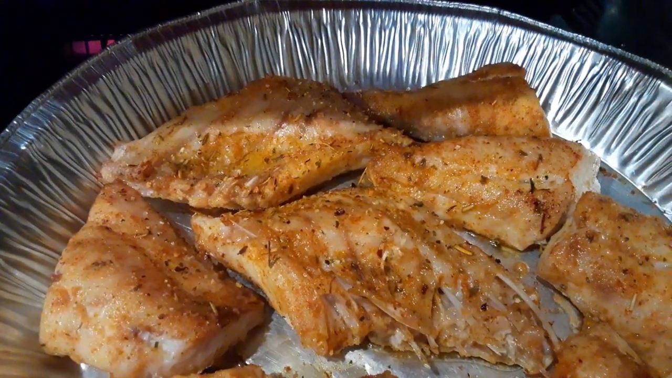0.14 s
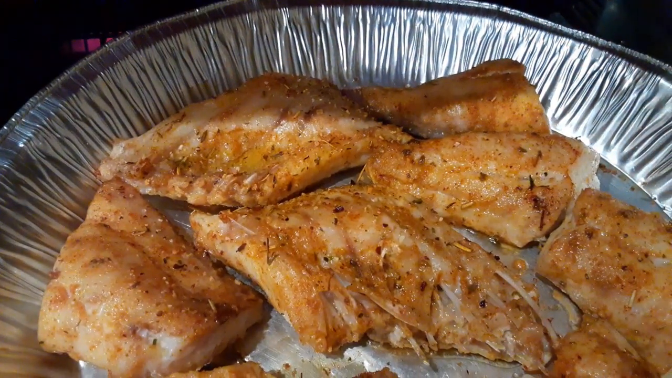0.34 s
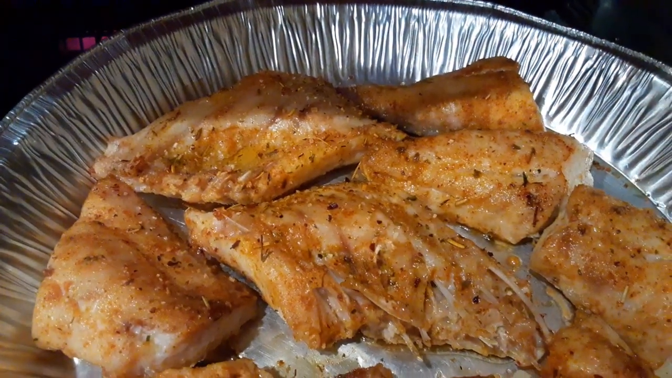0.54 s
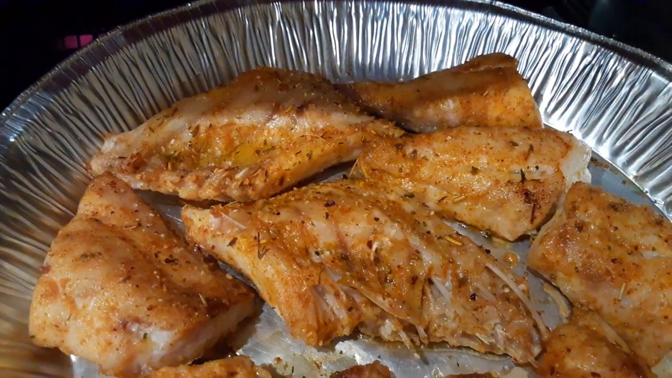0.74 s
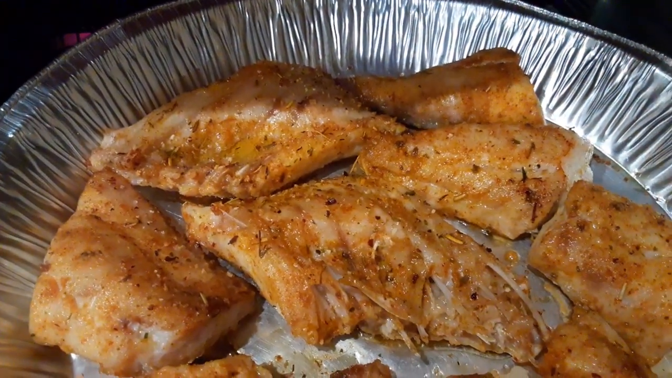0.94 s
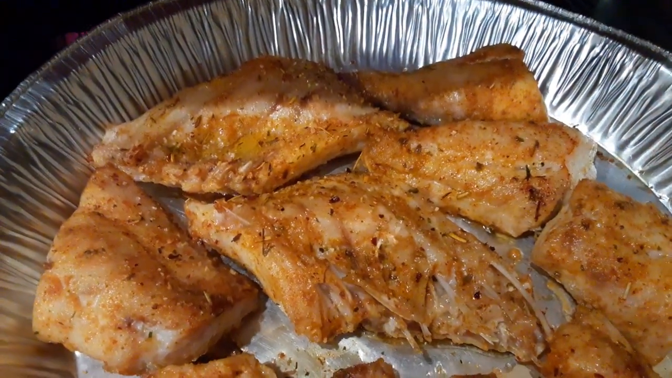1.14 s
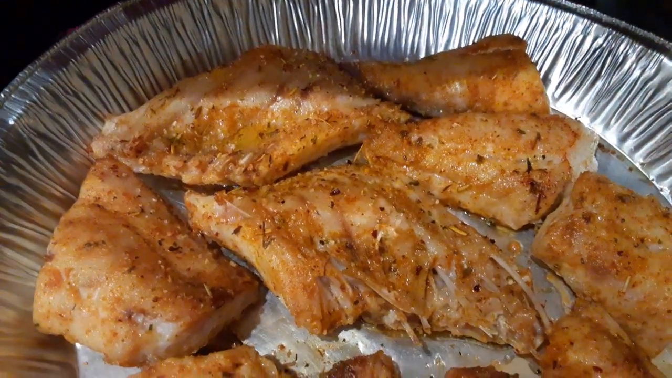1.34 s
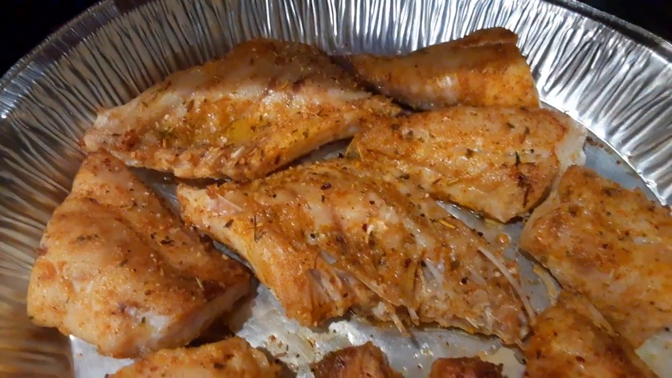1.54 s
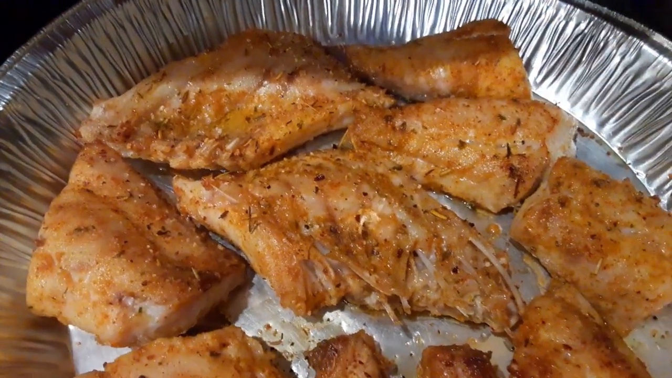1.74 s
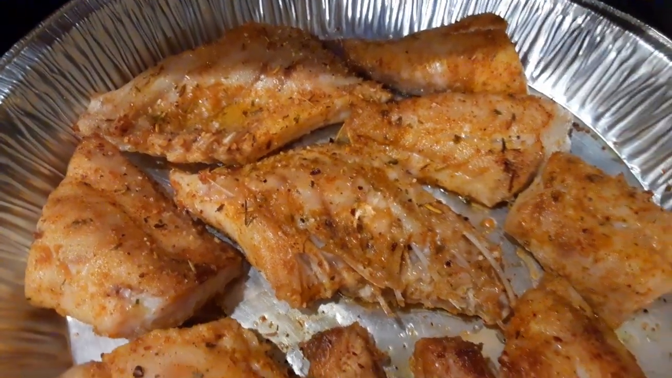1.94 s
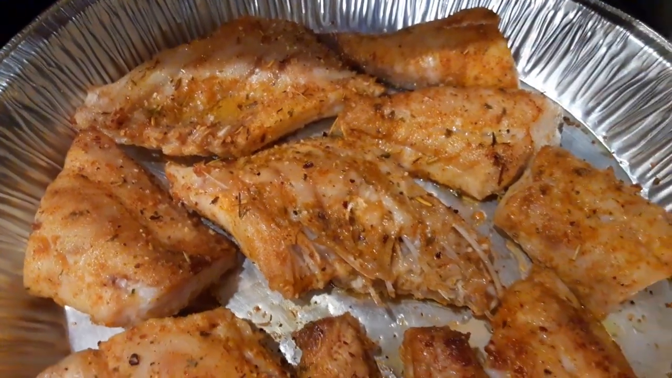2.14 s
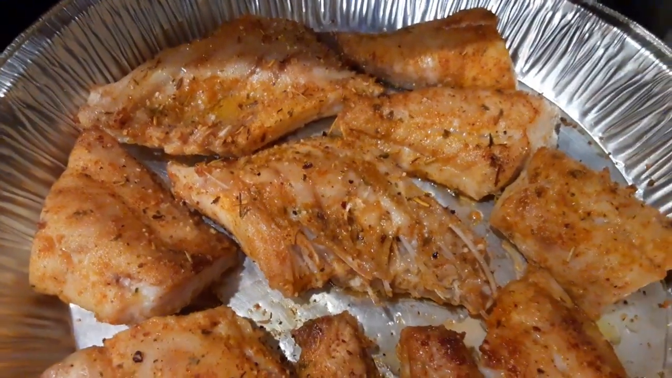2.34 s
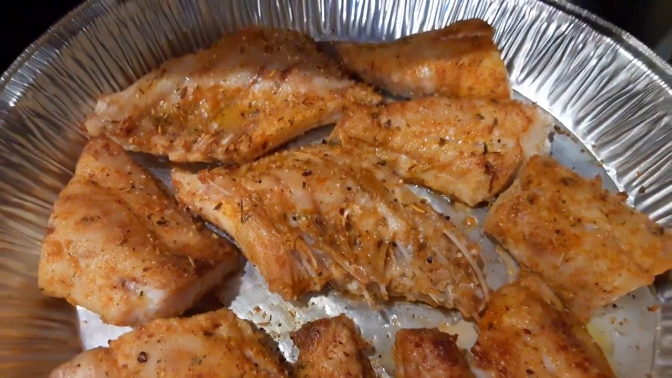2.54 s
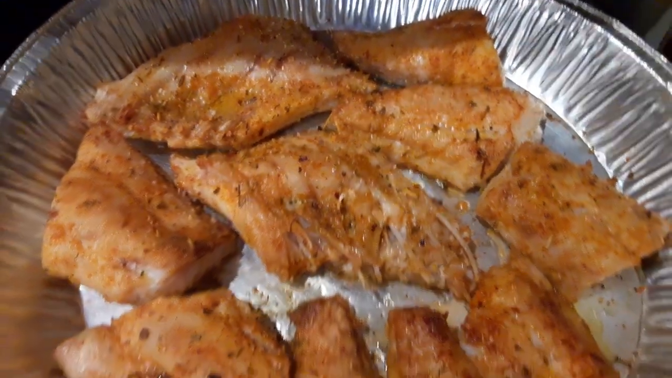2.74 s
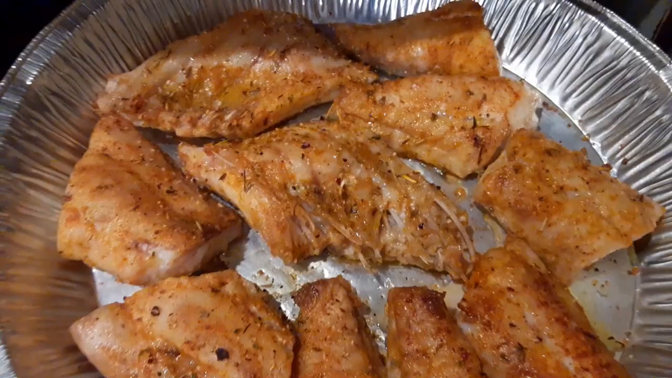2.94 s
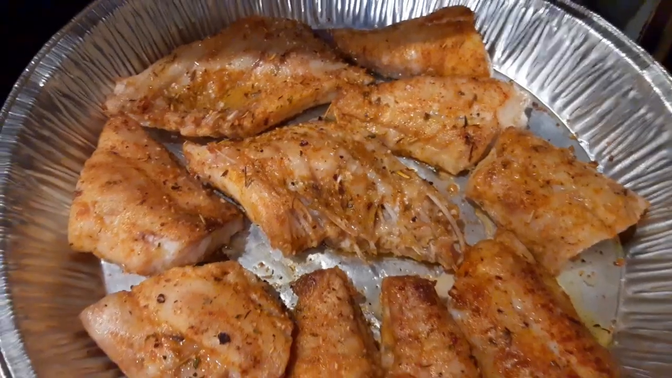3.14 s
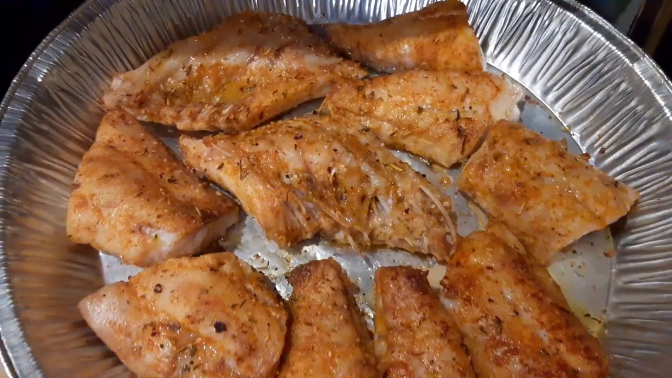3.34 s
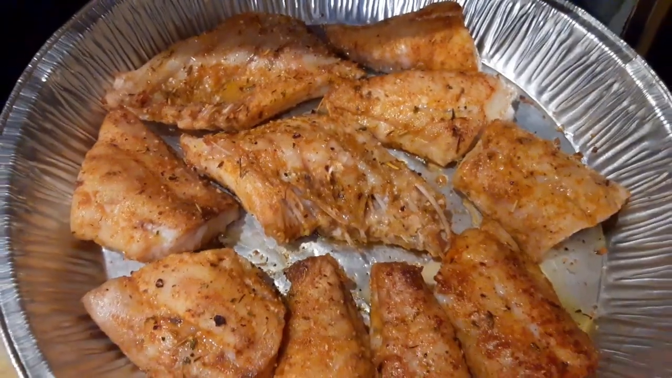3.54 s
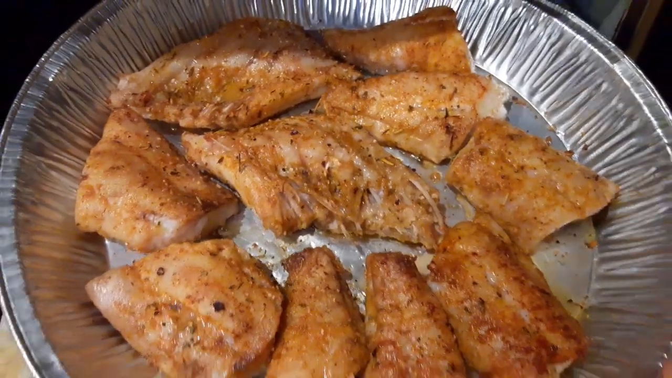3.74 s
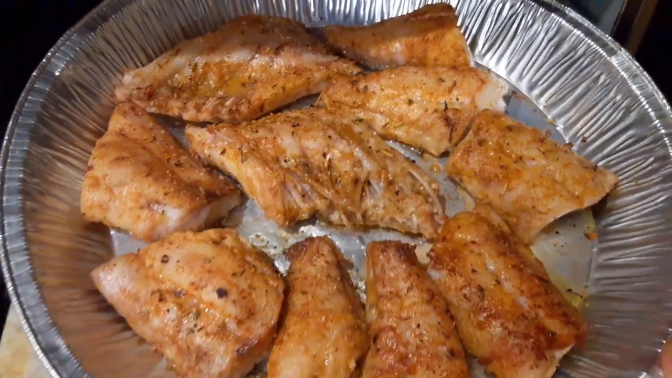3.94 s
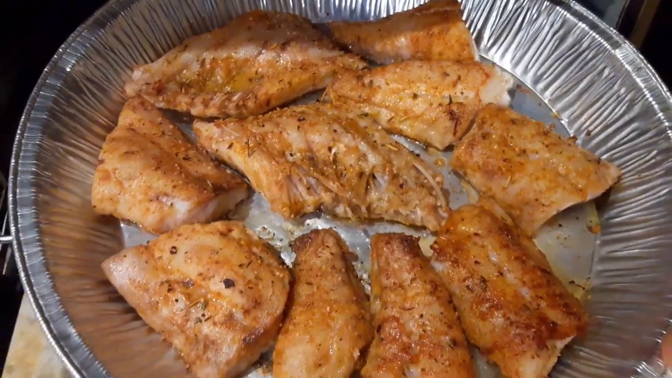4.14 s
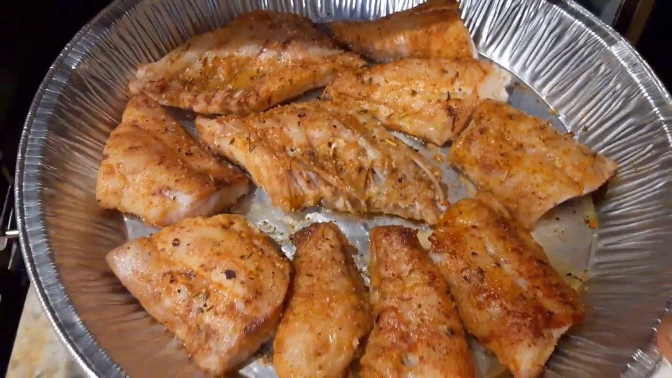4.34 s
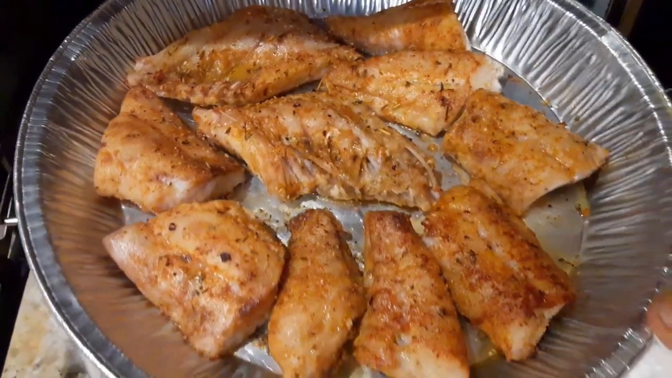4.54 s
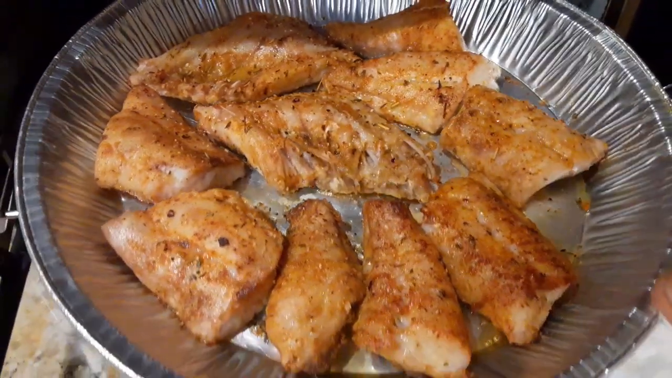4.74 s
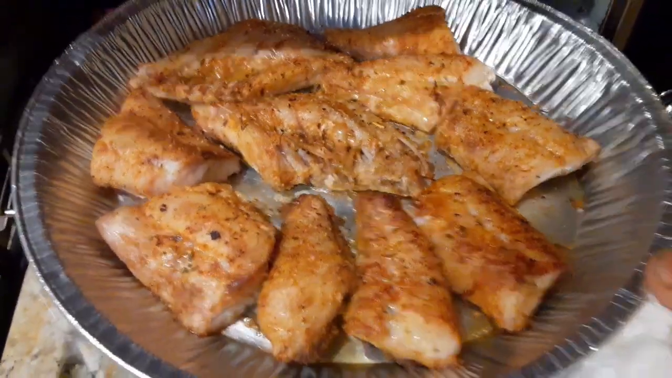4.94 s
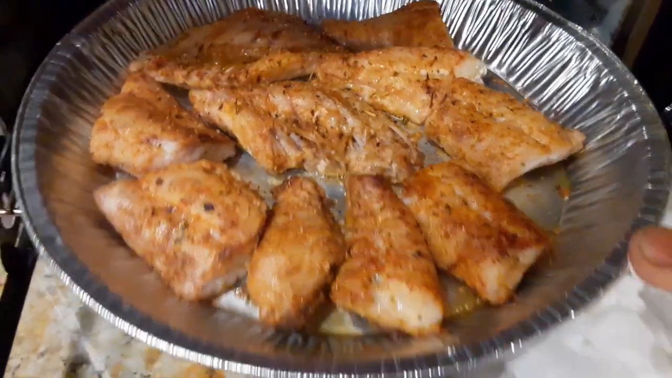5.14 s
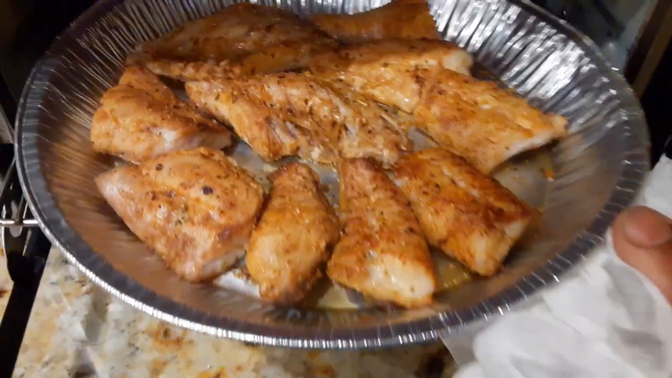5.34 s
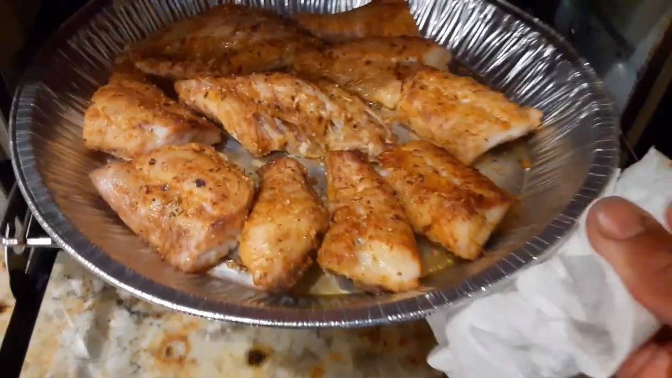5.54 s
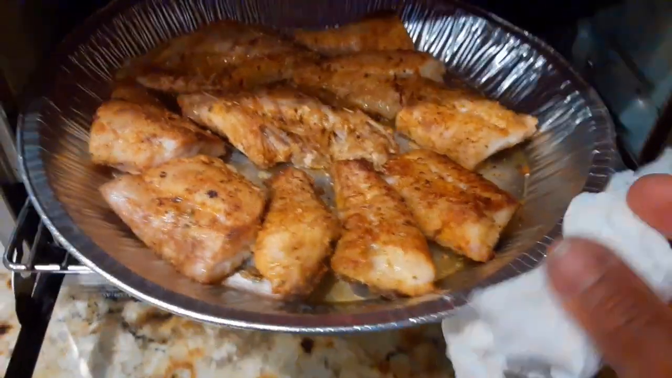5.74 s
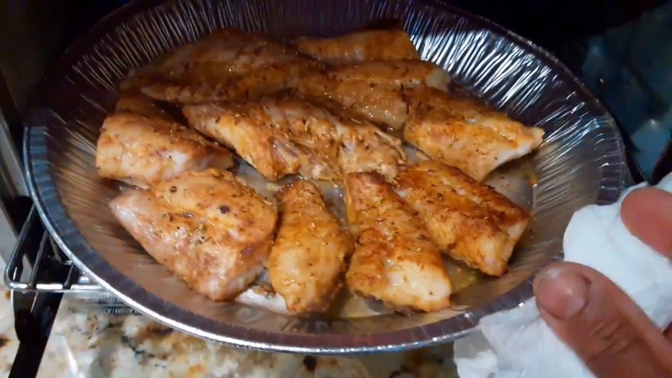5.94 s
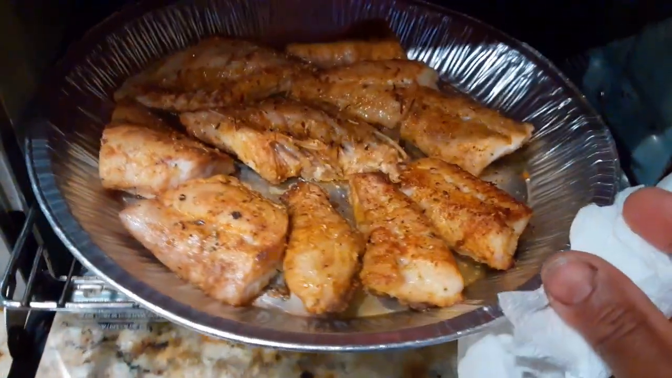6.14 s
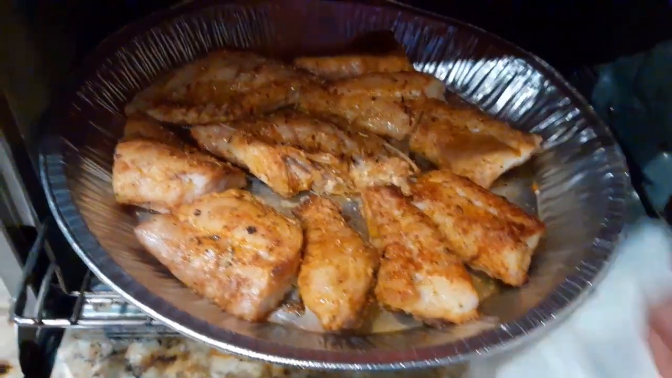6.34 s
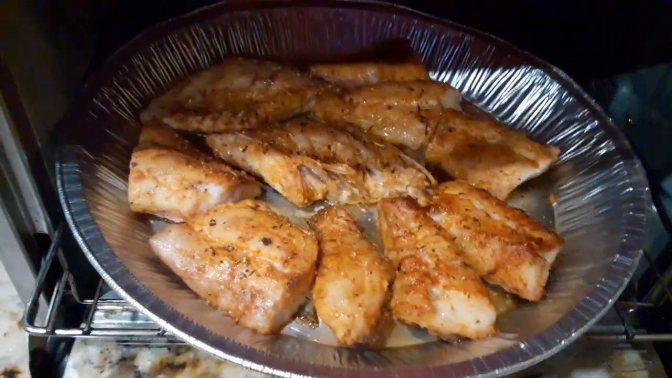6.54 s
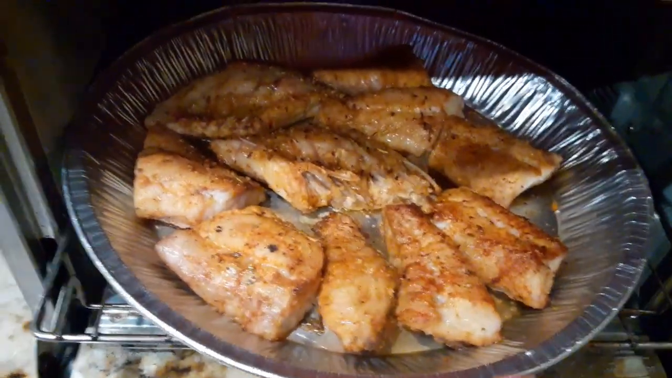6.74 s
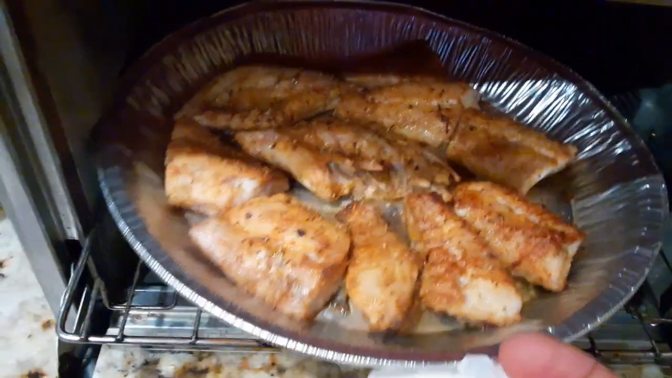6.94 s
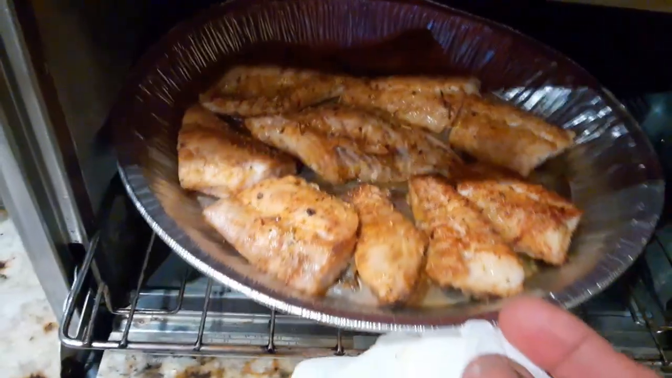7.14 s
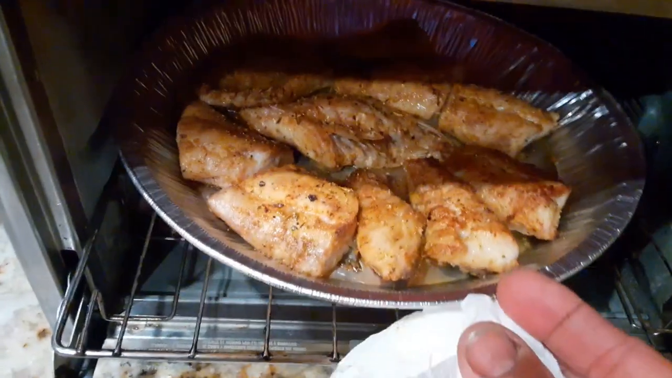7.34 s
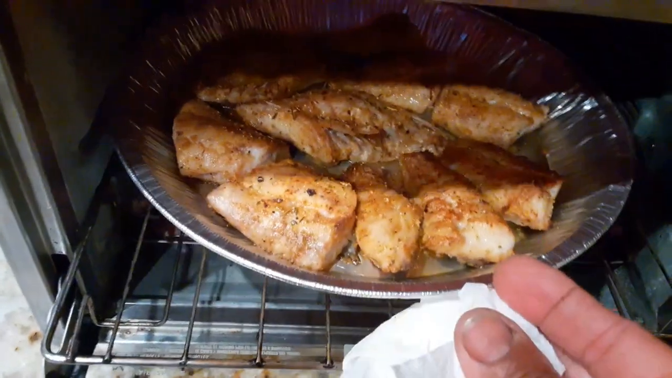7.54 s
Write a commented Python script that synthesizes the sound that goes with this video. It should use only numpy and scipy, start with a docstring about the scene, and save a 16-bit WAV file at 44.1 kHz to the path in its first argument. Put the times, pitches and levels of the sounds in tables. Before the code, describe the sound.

In a home kitchen, a steady low motor hum with airy fan noise sits under tiny, irregular foil ticks close to the microphone. One hard knock rings the thin pan near the start. Later the loaded pan bumps and rasps harshly over oven rack wires, crinkling, popping and squeaking briefly, pauses with a few light taps, then scrapes again in shorter strokes.

```python
"""In a kitchen a motor hums on multiples of its shaft rate over background hiss and rumble, filtered noise; its
main orders fade as the two-port microphone moves away. The creases of a loaded aluminium foil pan held close
tick in bursts of noise. The pan is knocked, ringing its modes and rattling, then pushed over the wires of an
oven rack in rasping strokes made of dense noise slips, with popping panels, more bumps and brief squeals."""
import sys
import numpy as np
from scipy import signal
from scipy.fft import rfft, irfft, next_fast_len
from scipy.io import wavfile
from scipy.ndimage import uniform_filter1d

SR = 44100
rng = np.random.default_rng(int(sys.argv[2]) if len(sys.argv) > 2 else 0)


def digitize_waveform(pressure):
    """Quantize a signal to 16-bit integers and store it at the path in sys.argv[1].

    Rows of a 2-D input are taken as channels; values are limited to [-1, 1].
    """
    field = np.atleast_2d(pressure).T
    bounded = np.clip(field, -1, 1)
    quanta = np.round(bounded * 32767).astype(np.int16)
    wavfile.write(sys.argv[1], SR, quanta)


N = 339129
T = np.arange(N) / SR


def undb(db):
    """Amplitude of a level in dB."""
    return 10 ** (np.asarray(db) / 20)


def unit(x):
    """Scale to rms 1 over all ports."""
    return x / np.sqrt(np.mean(x ** 2))


def curves(table):
    """Columns of a time table, one value a sample."""
    s, *columns = np.transpose(table)
    return [np.interp(T, s, c) for c in columns]


def colour(x, points):
    """Shape the spectrum by (Hz, dB) points, straight in log frequency; rms 1."""
    hz, db = np.transpose(points)
    size = next_fast_len(x.shape[-1])
    f = np.arange(size // 2 + 1) * SR / size + 1
    gain = undb(np.interp(np.log(f), np.log(hz), db))
    return unit(irfft(rfft(x, size) * gain, size)[..., :x.shape[-1]])


def band(x, lo_hz, hi_hz):
    """Band-pass, rms 1."""
    return unit(signal.sosfilt(signal.butter(3, [lo_hz, hi_hz], "band", fs=SR, output="sos"), x))


def ring(x, hz, width_hz):
    """One resonance driven by x, rms 1."""
    return unit(signal.lfilter(*signal.iirpeak(hz, hz / width_hz, SR), x))


def walk(rate_hz):
    """Random levels held 1 / rate_hz s and slewed twice; spread near 1."""
    k = int(SR / rate_hz)
    held = np.repeat(rng.standard_normal(N // k + 1), k)
    return 0.93 * uniform_filter1d(uniform_filter1d(held, k), k)[:N]


def ports(alike_hz, length=N):
    """Noise at the two ports, alike well under alike_hz and unrelated well above."""
    mid, side = rng.standard_normal((2, length))
    side = signal.lfilter(*signal.butter(1, alike_hz, "high", fs=SR), side)
    return np.array([mid + side, mid - side])


def lean(db):
    """Gains of the two ports, left minus right = db."""
    db = np.atleast_1d(db)
    return undb(np.array([db / 2, -db / 2]))


def add(out, s, x):
    """Mix x into out from s seconds on."""
    i = int(s * SR)
    out[:, i:i + x.shape[1]] += x[:, :N - i]


def grains(per_s, spread_db, tail_s):
    """Random slips of uneven size, each smeared by a short tail; an envelope of rms 1."""
    size = undb(spread_db * np.minimum(rng.exponential(size=N), 3.0))
    power = (rng.random(N) < per_s / SR) * size ** 2
    smeared = signal.lfilter([1], [1, -np.exp(-1 / (tail_s * SR))], power)
    return unit(np.sqrt(smeared + 1e-6))


def tone(db, phase, waver_db=0.57):
    """Sine of rms db with a wavering level and a random starting phase."""
    level = np.sqrt(2) * undb(db + waver_db * walk(8.2))
    return level * np.sin(phase + 2 * np.pi * rng.random())


# Motor as heard. Each row: time in s, then levels in dB of second order, fifth order, rumble, background hiss,
# # mains hum and housing ring.
HUM = [(0.0, -42.5, -47.5, -74, -49.5, -54, -65.5), (0.51, -44.5, -44, -66, -51, -54, -67.5),
       (1.5, -45.5, -45, -53, -48, -56, -62), (2.2, -49.5, -44.5, -52, -48, -64, -67.5),
       (2.7, -50.5, -44.5, -62, -49.5, -66, -64.5), (3.43, -56, -46.5, -72, -51, -71, -68.5),
       (5.44, -55, -48, -60, -48, -70, -69), (6.5, -56.5, -51.5, -60, -52, -64, -65.5),
       (7.69, -54, -54.5, -66, -47, -69, -67)]
# Weaker motor orders. Each row: multiple of the shaft rate, level in dB at the start.
WEAK_ORDERS = [(3, -64.5), (4, -67), (8, -68), (9, -83), (10, -66), (12, -65), (20, -67.5), (24, -69.5)]
# Mains buzz. Each row: frequency in Hz, level in dB.
BUZZ = [(241, -57), (297, -58)]
# Spectra of background hiss and rumble. Each row: frequency in Hz, relative level in dB per Hz.
HISS_SPECTRUM = [(30, -26), (110, -1), (160, -13.5), (250, -4), (330, -8.5), (520, -15), (700, -21),
                 (1030, -14), (1300, -25.5), (2900, -31), (4000, -34.5), (6000, -37.5), (8000, -57),
                 (11500, -37.5), (16000, -37)]
RUMBLE_SPECTRUM = [(20, -43), (35, -3), (55, 8), (75, 2), (110, -10), (140, -25), (200, -39)]
# Fan housing resonances. Each row: frequency in Hz, width in Hz, level in dB against the housing ring.
HOUSING = [(903, 20, 0), (1056, 56, 0), (1486, 24, -10), (1913, 61, -2), (2080, 22, -9.5), (2970, 46, -3.5)]
SHAFT_HZ, MAINS_HZ = 43.74, 59
WEAK_WAVER_DB, WEAK_WAVER_RATIO = 1.5, 0.0036  # weak orders wander more in level and pitch
HOUSING_FLUTTER_DB = 1.8
BOXY_HZ = 1200  # only housing rings below this follow the ring column; the rest keep its first value


def kitchen():
    """Motor orders lock to one wavering shaft phase; buzz and hum are sines; hiss and rumble are noise."""
    second_db, fifth_db, rumble_db, hiss_db, mains_db, ring_db = curves(HUM)
    turn = 2 * np.pi * np.cumsum(SHAFT_HZ * (1 + 0.0012 * walk(1.974))) / SR
    out = lean(4.0) * tone(second_db, 2 * turn) + lean(0.3) * tone(fifth_db, 5 * turn)

    loose_turn = turn + 2 * np.pi * np.cumsum(SHAFT_HZ * WEAK_WAVER_RATIO * walk(6.0)) / SR
    half_fade_db = (fifth_db - fifth_db[0]) / 2
    for multiple, db in WEAK_ORDERS:
        out += tone(db + half_fade_db, round(multiple) * loose_turn, WEAK_WAVER_DB)

    for hz, db in BUZZ:
        out += tone(db, 2 * np.pi * hz * T)
    out += lean(3.0) * tone(mains_db, 2 * np.pi * MAINS_HZ * T, 2.2)

    hiss = ports(530)
    out += undb(hiss_db + 0.61 * walk(2.47)) * colour(hiss, HISS_SPECTRUM)
    for hz, width_hz, db in HOUSING:
        level_db = db + (ring_db if hz < BOXY_HZ else ring_db[0])
        out += undb(level_db + HOUSING_FLUTTER_DB * walk(16.0)) * ring(hiss, hz, width_hz)
    return out + undb(rumble_db) * lean(3.0) * colour(ports(130), RUMBLE_SPECTRUM)


# Clearest creases snapping. Each row: start in s, hiss level in dB under the sharp front, body level in dB
# against the hiss.
TICKS = [(0.089, -70, 14), (0.736, -61, 15), (0.7896, -47.5, 0), (0.818, -52.5, 8), (0.96, -58, 6),
         (1.2244, -51, -10), (1.301, -58, 5), (1.3156, -47.5, -3), (1.3766, -60.5, 17), (1.412, -65, 12),
         (1.467, -57, 11), (1.489, -60, 7), (1.532, -60, 12), (1.5558, -60, 15), (1.588, -61, 17),
         (1.614, -60, 17), (1.6528, -43, -3), (1.705, -57.5, 14), (1.7232, -45.5, 1), (1.791, -52.5, 12),
         (1.826, -42, -10), (1.842, -48, 5), (1.8606, -50, 0), (1.874, -40, -16), (1.9125, -51, 5),
         (1.9388, -58, 11), (1.967, -41, -8), (1.9994, -49.5, 6), (2.015, -46, -14), (2.0467, -41.5, -12),
         (2.065, -51, 4), (2.157, -40, -14), (2.166, -50, 7), (2.203, -42, -2), (2.3052, -47.5, -4),
         (2.337, -46, -20), (2.558, -52, -9), (2.568, -53, 14.5), (2.6189, -54.5, 10), (2.662, -61, 9),
         (2.71, -54, 7), (2.8796, -41, -15), (3.032, -42.5, -17), (3.0563, -47.5, 0), (3.1876, -46.5, -11),
         (3.374, -45, -7), (3.789, -44.5, -15), (4.35, -43, -10), (4.509, -46, -11), (4.5436, -48, -9),
         (4.57, -49, -9), (4.612, -48.5, -5), (4.708, -50.5, -3), (4.826, -46, -3), (4.878, -56, 13),
         (5.009, -43, 8), (5.333, -41, -12), (5.512, -42, -15), (5.554, -43, -10), (5.604, -33, -15),
         (5.724, -37, -4), (5.737, -40, -4), (6.379, -56, 4), (6.439, -43, -21), (6.4905, -61, 2),
         (6.707, -67, 1), (6.7345, -53, -7), (6.8202, -37, -13), (7.463, -42.5, 2), (7.523, -57, 6)]
# Spectra of hiss, body and sheen. Each row: frequency in Hz, relative level in dB per Hz.
TICK_HISS = [(700, 6), (1800, 6), (3000, 0), (5000, 2.5), (7000, -5.5), (9000, -28)]
TICK_BODY = [(300, -20), (650, 3), (1000, 8), (1700, 11), (2500, 2), (4000, -25)]
TICK_SHEEN = [(6000, -49), (8500, 3), (12000, 4), (16000, 3.5)]
TICK_HISS_T60_S, TICK_BODY_T60_S, TICK_SHEEN_T60_S = 0.04, 0.025, 0.04
TICK_SHEEN_DB = -7  # against the hiss
FRONT_DB, FRONT_S = 7, 0.0015  # sharp front of a tick over its tail
# Handling rustle, up to the last row. Each row: time in s, level in dB.
RUSTLE = [(0, -58.5), (1, -56.5), (1.9, -55.5), (2.5, -60), (3.5, -59.5), (4.2, -60.5), (4.6, -60),
          (4.9, -55)]


def creases():
    """Each snap is a sharp burst of foil hiss with a duller body and a sheen, over a faint random crackle."""
    out, t = np.zeros((2, N)), T[:2048]
    for s, db, body_db in TICKS:
        burst = ports(690, len(t))
        parts = [(TICK_HISS, 0, TICK_HISS_T60_S),
                 (TICK_BODY, body_db, TICK_BODY_T60_S),
                 (TICK_SHEEN, TICK_SHEEN_DB, TICK_SHEEN_T60_S)]
        snap = sum(colour(burst, shape) * undb(part_db - 60 * t / t60_s) for shape, part_db, t60_s in parts)
        attack = np.minimum(t / 0.0014, 1)
        add(out, s, undb(db + FRONT_DB * np.exp(-t / FRONT_S)) * snap * attack)
    rustle_db, = curves(RUSTLE)
    crackle = grains(90, 1.3, 0.01) * band(ports(900), 200, 2600)
    return lean(1.5) * (out + undb(rustle_db) * (T < RUSTLE[-1][0]) * crackle)


# Blows on the pan. Each row: start in s, peak in dB before the lean, pitch of the spot struck in Hz, starting
# rattle in dB before the lean, ring time factor, focus in dB an octave (below 0 acts as 0).
KNOCKS = [(2.339, -10.5, 510, -31.5, 0.51, 8.5), (2.363, -30, 520, -45, 0.97, 21),
          (4.825, -30, 1010, -42, 0.34, 18), (4.951, -21.5, 468, -37.5, 0.56, 12),
          (4.961, -24, 487, -57, 0.95, 12), (5.074, -20, 900, -32.5, 0.79, -2),
          (5.694, -15.5, 970, -21.5, 0.87, 44), (5.698, -17.5, 960, -20.5, 0.49, 29),
          (5.711, -25, 660, -27, 1.6, 23), (5.724, -26, 1000, -32, 1.6, 2),
          (5.746, -26.5, 557, -41, 0.83, 14), (5.766, -30, 503, -55, 1, 12),
          (5.836, -29, 1500, -36.5, 1.5, 1), (5.926, -27, 900, -48, 0.92, 13),
          (6.333, -26, 1120, -45, 0.86, 44), (6.783, -23, 1030, -36.5, 1.15, 23),
          (6.871, -25.5, 1140, -36, 0.98, 19), (7.148, -38, 1100, -47, 0.6, 16)]
# Pan modes. Each row: frequency in Hz, relative level in dB, t60 in s at ring time factor 1.
PAN_MODES = [(285, -15, 0.27), (471, 1.5, 0.11), (649, -3.5, 0.12), (798, -14, 0.27), (840, -15, 0.38),
             (962, 0, 0.072), (1047, -6, 0.081), (1280, -18, 0.079), (1420, -8, 0.1), (1570, 0, 0.094),
             (2226, 0, 0.093), (2720, -17, 0.036), (2970, -2, 0.041), (4100, -6, 0.09), (6100, -12, 0.042)]
# Spectrum of the rattle. Each row: frequency in Hz, relative level in dB per Hz.
RATTLE_SPECTRUM = [(90, -39), (200, 0.5), (450, -5), (1000, -1.5), (2000, -6), (3500, -4), (7500, -18.5),
                   (12000, -19.5), (16000, -20)]
RATTLE_T60_S, RATTLE_TREBLE_T60_S = 0.24, 0.22  # at factor 1; the treble decays by both
CONTACT_S = 0.001  # time a blow presses on the sheet
KNOCK_LEAN_DB = 3.5


def knocks():
    """A blow wakes most the pan modes near the pitch of the spot struck; loose foil rattles after it."""
    out, t = np.zeros((2, N)), T[:8000]
    hz, mode_db, t60_s = (c[:, None] for c in np.transpose(PAN_MODES))
    for s, db, spot_hz, rattle_db, ring_factor, focus_db in KNOCKS:
        octaves_off = np.minimum(np.abs(np.log2(hz / spot_hz)), 1.3)
        near_db = -max(focus_db, 0) * octaves_off
        # the two ports hear the higher modes from different parts of the sheet
        lag = 0.37 * np.minimum(hz / 700, 4) * rng.standard_normal((2, len(PAN_MODES), 1))
        decay = undb(mode_db + near_db - 60 * t / (t60_s * ring_factor))
        modes = decay * np.cos(2 * np.pi * hz * (t - CONTACT_S) + lag)
        # the sheet is pressed in over the contact time, then springs back
        blow = -modes.sum(axis=1) * np.sin(np.pi / 2 * np.minimum(t / CONTACT_S, 1))
        blow = signal.lfilter(*signal.butter(2, 220, "high", fs=SR), blow)  # a small pan radiates no bass
        rattle = colour(ports(860, len(t)), RATTLE_SPECTRUM)
        rattle = rattle * undb(rattle_db - 60 * t / (RATTLE_T60_S * ring_factor))
        # thin foil loses its treble first
        dull = signal.lfilter(*signal.butter(1, 1500, fs=SR), rattle)
        rattle = dull + (rattle - dull) * undb(-60 * t / (RATTLE_TREBLE_T60_S * ring_factor))
        add(out, s, lean(KNOCK_LEAN_DB) * (undb(db) * blow / np.abs(blow).max() + rattle))
    return out


def patches():
    """Each part of the sheet catches in its own short fits."""
    return grains(280, 0.33, 0.03)


# Strokes over the wires and the rests between. Each row: time in s, rasp level in dB.
STROKES = [(4.62, -54), (4.7, -55.5), (4.85, -60.5), (4.93, -48.5), (5.07, -36), (5.42, -32.5),
           (5.55, -33.5), (5.72, -35), (5.87, -47), (5.98, -43), (6.12, -38), (6.19, -41), (6.22, -45),
           (6.26, -42), (6.32, -45), (6.4, -56.5), (6.5, -57), (6.55, -55), (6.6, -59), (6.645, -55),
           (6.69, -64), (6.74, -53.5), (6.78, -43), (6.85, -39.5), (6.92, -34.5), (7.0, -37.5), (7.05, -36),
           (7.11, -38), (7.21, -30.5), (7.27, -38.5), (7.4, -41.5), (7.45, -49), (7.55, -44), (7.62, -47),
           (7.69, -59)]
# The pan's place. Each row: time in s, then body, sheen and oven boom in dB against a full rasp,
# left minus right in dB.
PLACE = [(4.8, 9, -2, -2, 3.3), (5.05, -4, -6.5, -10.5, 3), (5.6, -7.5, -3.5, -12, 2.9),
         (6.2, -2.5, -7, -8.5, 2.2), (6.26, -4.5, 0.5, -8.5, 1.9), (6.9, -2.5, -2.5, -8.5, 1.3),
         (7.2, -1, -4, -9.5, 1.7), (7.69, 1.5, -5, -6, 2.4)]
# Spectrum of the rasp. Each row: frequency in Hz, relative level in dB per Hz.
RASP_SPECTRUM = [(130, -10), (230, -2), (370, -8), (650, -13), (1090, -6), (1300, -13), (3400, -14.5),
                 (5000, -19), (7600, -25), (10500, -21), (16000, -24.5)]
# Foil and wires ringing under the rasp. Each row: frequency in Hz, width in Hz, level in dB against the rasp.
RASP_PEAKS = [(648, 7.3, -17.5), (940, 290, -28), (1600, 140, -28), (2240, 20, -43)]
# Band edges in Hz; body, rasp and sheen lie between.
RASP_EDGES_HZ = 370, 1500, 5500, 18000
# Factors on the place's lean for body, rasp and sheen.
LEAN_SHARES = 0.8, 1.25, 0.35
SLIPS_PER_S, SLIP_SPREAD_DB, SLIP_TAIL_S = 2500, 2.0, 0.0015
# dB gained per dB the rasp lies under full: a trace less body, more boom
FULL_RASP_DB, BODY_PER_DB, BOOM_PER_DB = -30, -0.0124, 0.1869
CATCH_DB = 0.9  # quick flutter of each part of the rasp


def slide():
    """Ridged foil dragged over wires: dense slips excite the sheet, heard as body, rasp, sheen and boom."""
    rasp_db, = curves(STROKES)
    body_db, sheen_db, boom_db, lean_db = curves(PLACE)
    light_db = FULL_RASP_DB - rasp_db
    slips = grains(SLIPS_PER_S, SLIP_SPREAD_DB, SLIP_TAIL_S) * ports(940)
    sheet = colour(slips, RASP_SPECTRUM)
    for hz, width_hz, db in RASP_PEAKS:
        sheet = sheet + undb(db + 1.0 * walk(21)) * ring(slips, hz, width_hz)

    out = np.zeros((2, N))
    part_dbs = body_db + BODY_PER_DB * light_db, 0, sheen_db
    for lo_hz, hi_hz, db, share in zip(RASP_EDGES_HZ, RASP_EDGES_HZ[1:], part_dbs, LEAN_SHARES):
        part = band(sheet * patches(), lo_hz, hi_hz) * lean(share * lean_db)
        out += undb(rasp_db + db + CATCH_DB * walk(40)) * part
    boom_level_db = rasp_db + boom_db + BOOM_PER_DB * light_db + 0.67 * walk(5.4)
    out += undb(boom_level_db) * band(sheet, 104, 405)
    out += undb(rasp_db) * crinkles() * lean(LEAN_SHARES[1] * lean_db)
    return out * np.clip((T - STROKES[0][0]) / 0.19, 0, 1)  # fade in


# Small foil panels popping under the rasp. Each row: frequency in Hz, width in Hz, then level in dB against
# the rasp in the first stroke and in the later strokes.
PANELS = [(670, 17, -24, -17), (1090, 130, -23, -19), (1376, 21, -19, -11.5), (1600, 74, -23, -16),
          (2330, 120, -14, -20), (2760, 160, -13.5, -21), (3376, 170, -12, -30), (4050, 250, -13, -16),
          (4790, 170, -21, -29), (5830, 43, -22, -34)]
CRINKLES_PER_S, CRINKLE_SPREAD_DB = 340, 2.8  # for each panel
FIRST_STROKE_ENDS_S = 5.8


def crinkles():
    """Each small panel pops many times a second, at uneven strength, and rings briefly."""
    out, start = np.zeros((2, N)), int(STROKES[0][0] * SR)
    t = T[start:]
    for hz, width_hz, first_db, later_db in PANELS:
        size = undb(CRINKLE_SPREAD_DB * np.minimum(rng.exponential(size=len(t)), 3.0))
        pops = (rng.random(len(t)) < CRINKLES_PER_S / SR) * size * ports(1200, len(t))
        level = undb(np.where(t < FIRST_STROKE_ENDS_S, first_db, later_db))
        out[:, start:] += level * ring(pops, hz, width_hz)
    return out


# Squeals and groans. Each row: centre in s, time from centre to 1/e in s, frequency in Hz, level in dB before
# the swell and lean.
SQUEALS = [(5.15, .035, 245, -39), (5.31, .015, 250, -40), (5.415, .015, 260, -40), (5.505, .015, 250, -40),
           (5.425, .012, 800, -38), (5.477, .005, 3400, -27), (5.543, .006, 750, -38),
           (5.385, .025, 3450, -37), (5.607, .006, 3700, -38), (5.755, .03, 520, -37),
           (6.8, .012, 5500, -45), (6.862, .012, 680, -42), (7.04, .012, 260, -39), (7.215, .015, 260, -39),
           (6.925, .015, 1050, -41), (6.945, .006, 4000, -40), (7.195, .02, 1060, -38),
           (7.24, .025, 1050, -37)]


def squeals():
    """Foil briefly grips a wire: narrow noise with a faint octave below, swelling and dying."""
    out = np.zeros((2, N))
    t = T[:6000] - T[3000]
    for s, length_s, hz, db in SQUEALS:
        grip = ports(3000, len(t))
        voice = ring(grip, hz, 56) + 0.043 * ring(grip, hz / 2, 180)
        swell = np.exp(-(t / length_s) ** 2)
        add(out, s + t[0], lean(KNOCK_LEAN_DB) * undb(db) * swell * voice)
    return out


def scene():
    """All layers summed."""
    return kitchen() + creases() + knocks() + slide() + squeals()


TOP_HZ = 15850


def record(dry):
    """The recorder cuts the top steeply."""
    return signal.sosfilt(signal.ellip(10, 0.2, 75, TOP_HZ, fs=SR, output="sos"), dry)


dry = scene()
out = record(dry)
digitize_waveform(out)
```